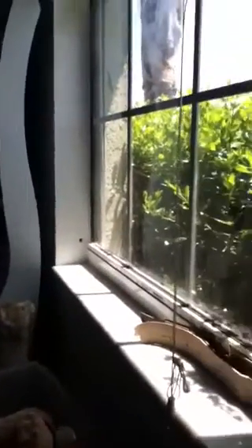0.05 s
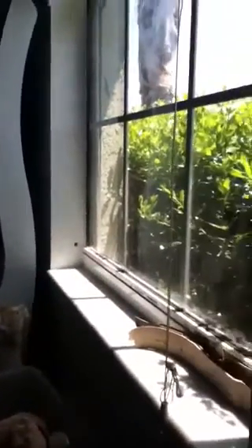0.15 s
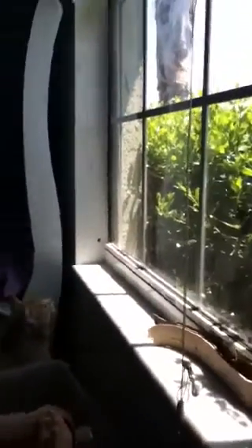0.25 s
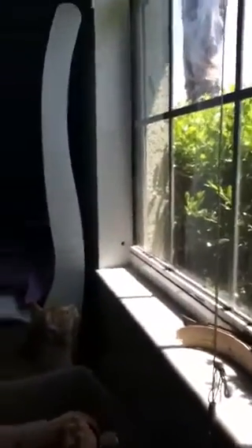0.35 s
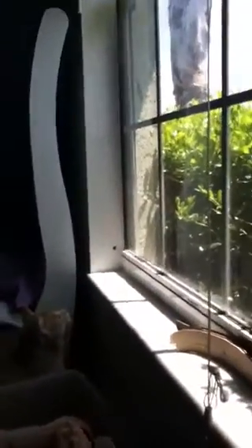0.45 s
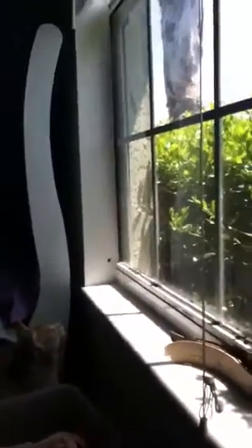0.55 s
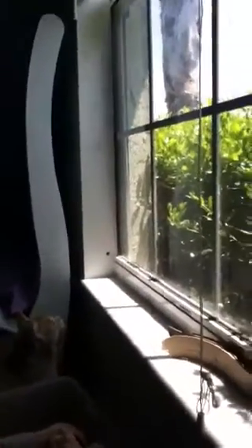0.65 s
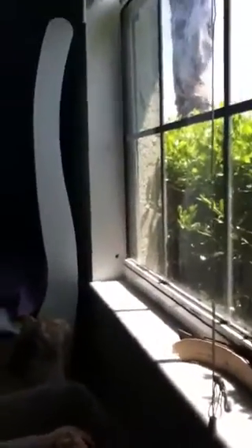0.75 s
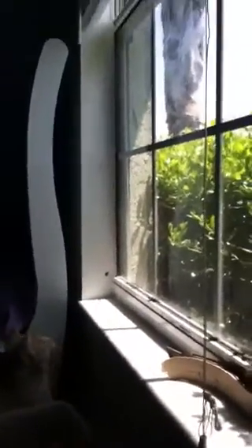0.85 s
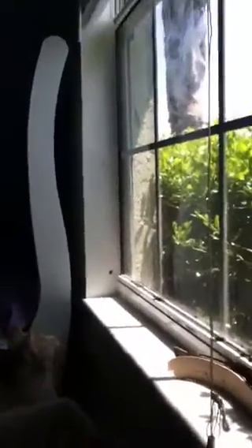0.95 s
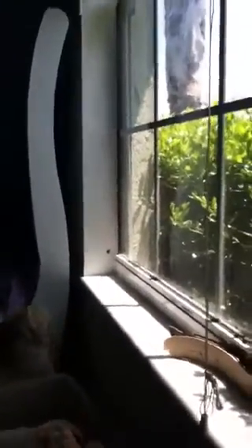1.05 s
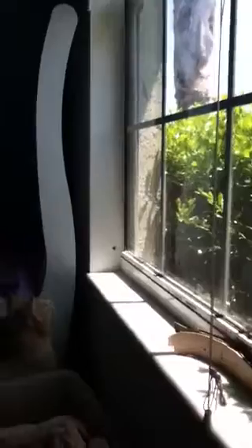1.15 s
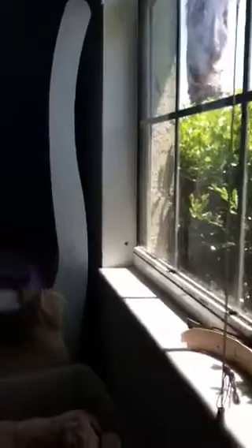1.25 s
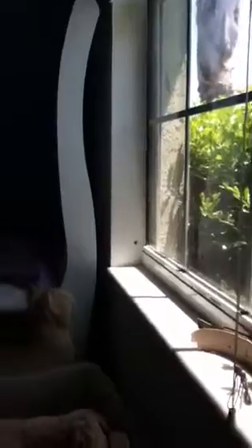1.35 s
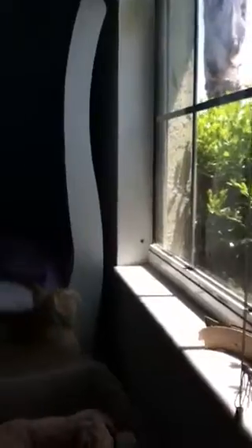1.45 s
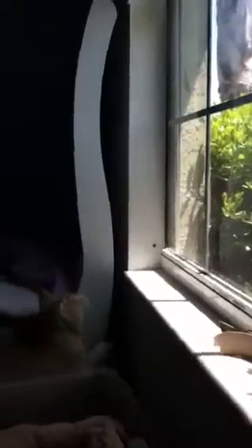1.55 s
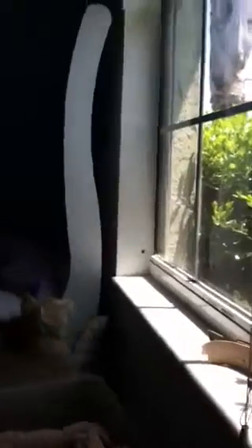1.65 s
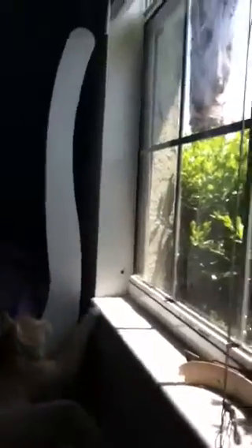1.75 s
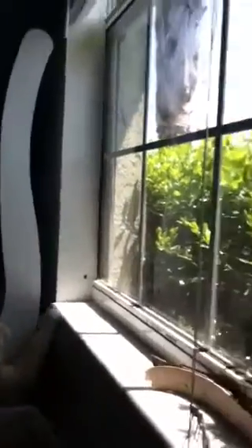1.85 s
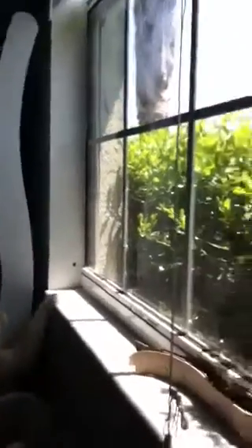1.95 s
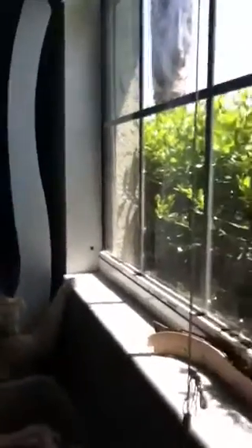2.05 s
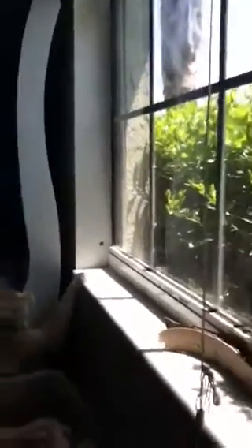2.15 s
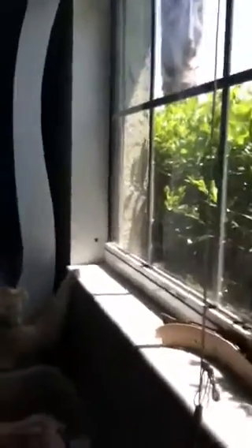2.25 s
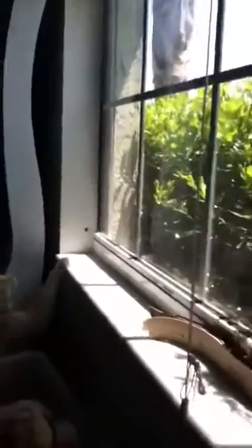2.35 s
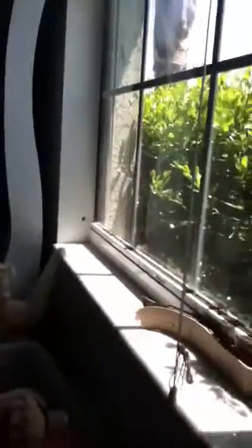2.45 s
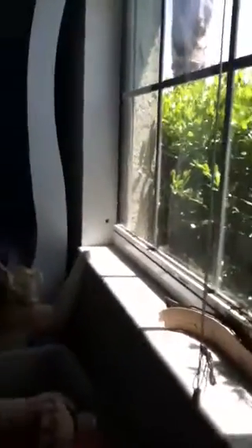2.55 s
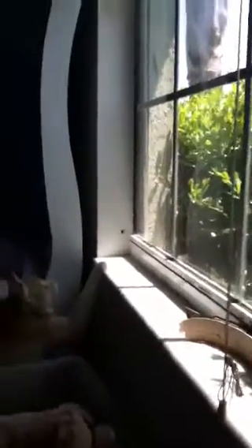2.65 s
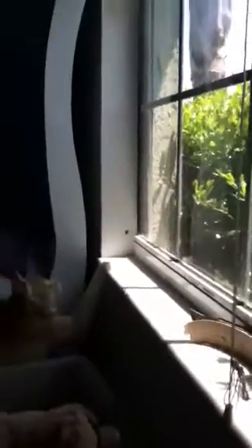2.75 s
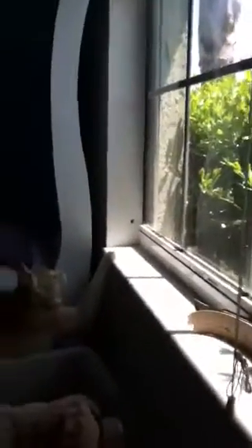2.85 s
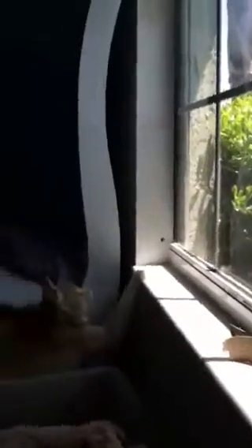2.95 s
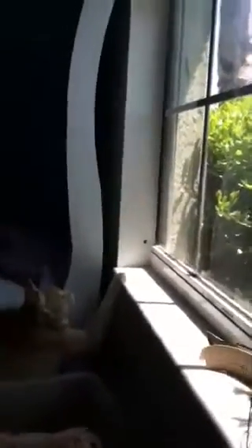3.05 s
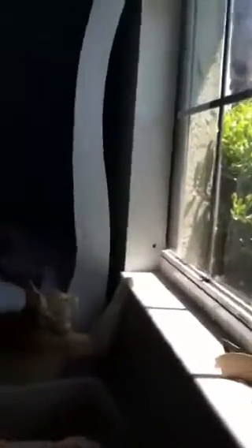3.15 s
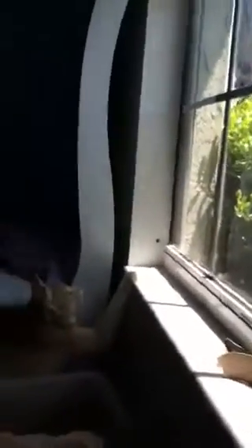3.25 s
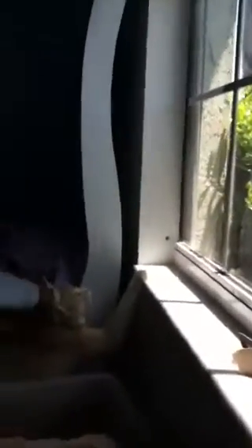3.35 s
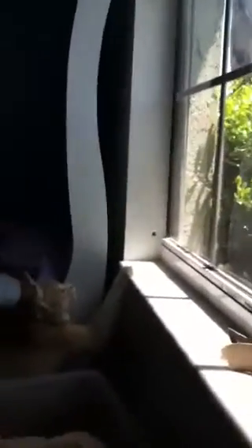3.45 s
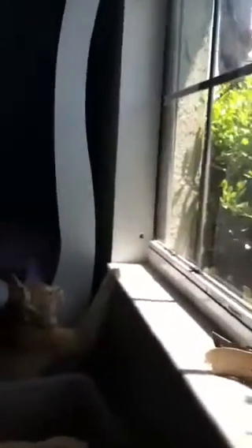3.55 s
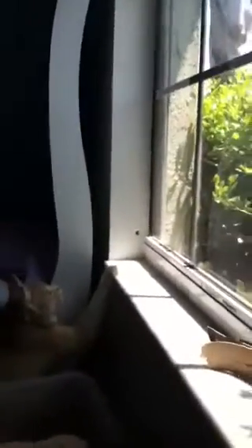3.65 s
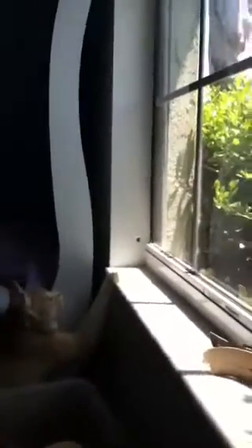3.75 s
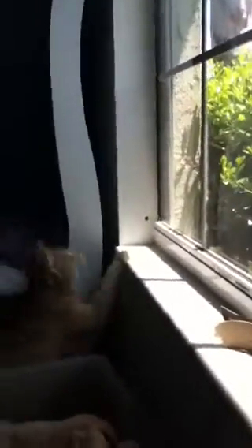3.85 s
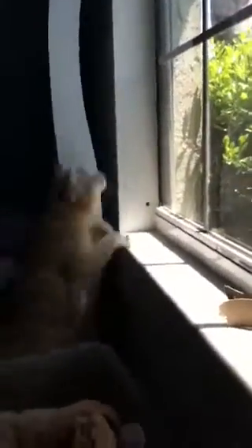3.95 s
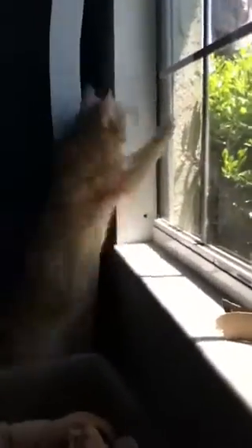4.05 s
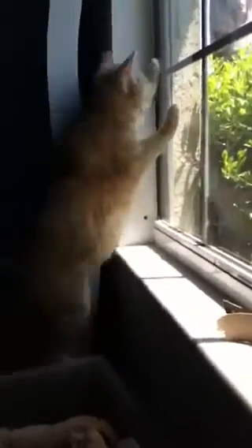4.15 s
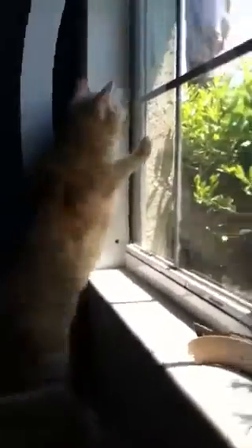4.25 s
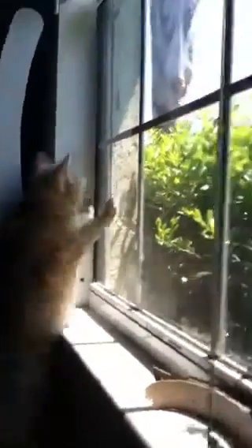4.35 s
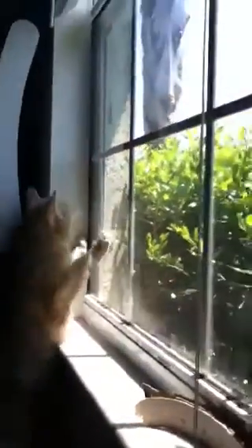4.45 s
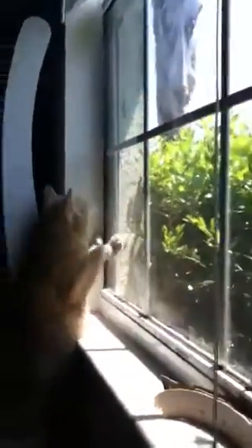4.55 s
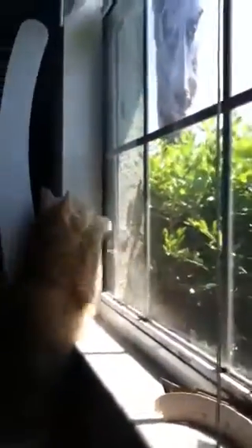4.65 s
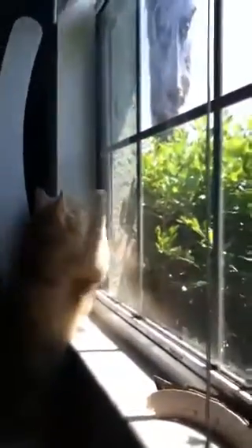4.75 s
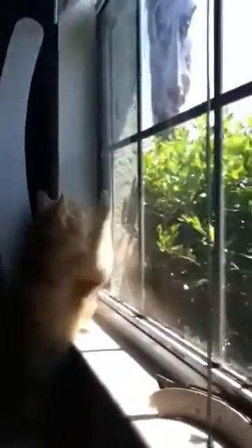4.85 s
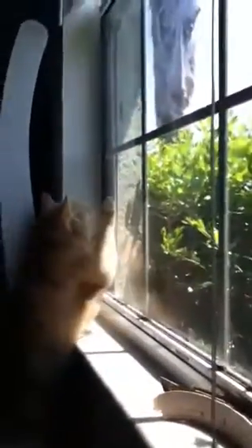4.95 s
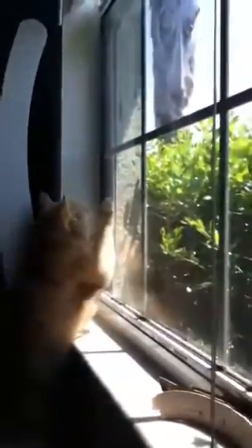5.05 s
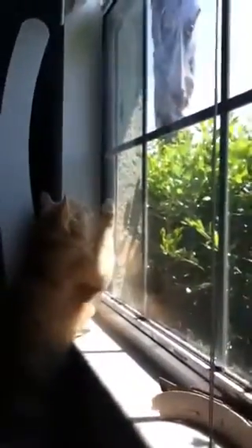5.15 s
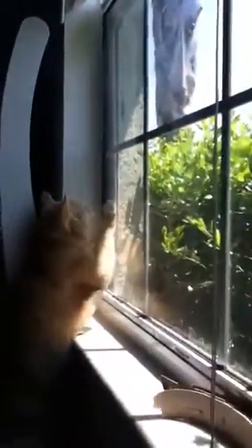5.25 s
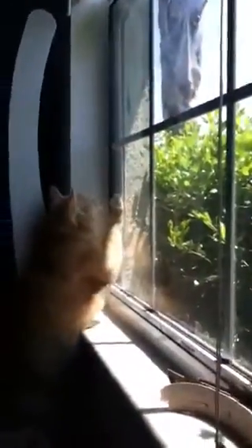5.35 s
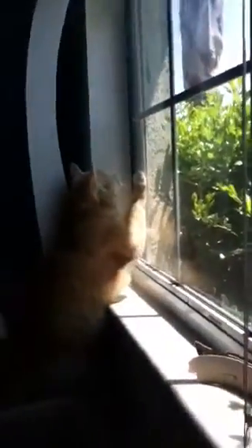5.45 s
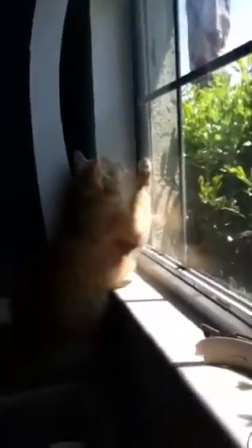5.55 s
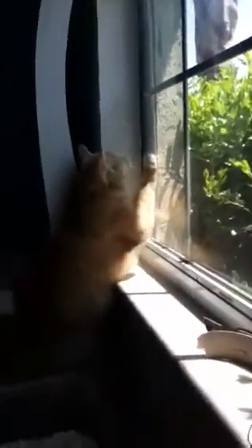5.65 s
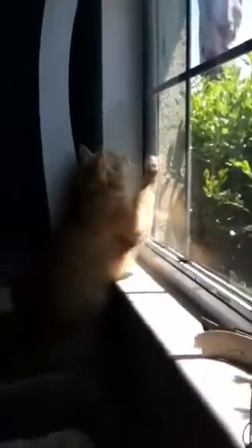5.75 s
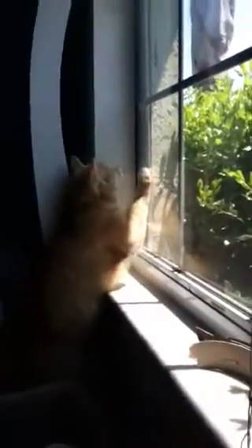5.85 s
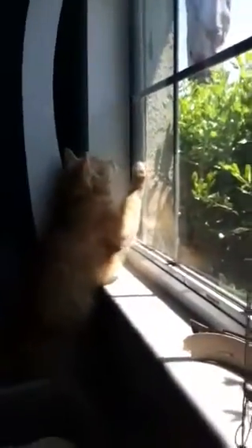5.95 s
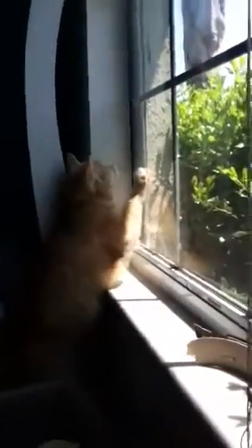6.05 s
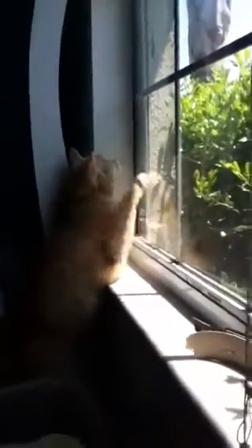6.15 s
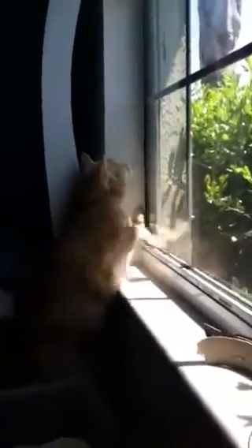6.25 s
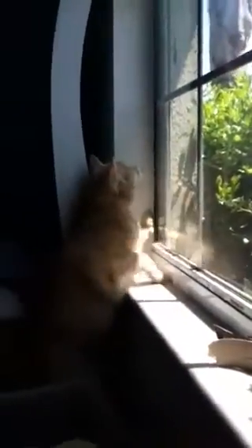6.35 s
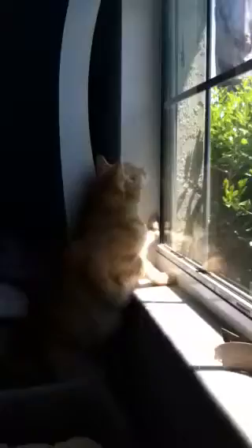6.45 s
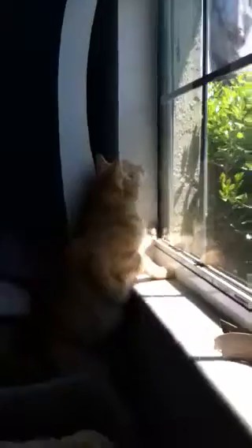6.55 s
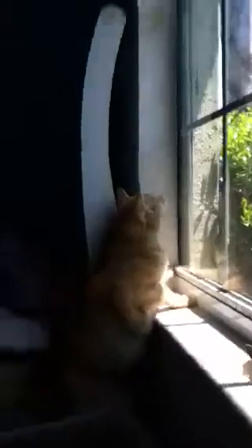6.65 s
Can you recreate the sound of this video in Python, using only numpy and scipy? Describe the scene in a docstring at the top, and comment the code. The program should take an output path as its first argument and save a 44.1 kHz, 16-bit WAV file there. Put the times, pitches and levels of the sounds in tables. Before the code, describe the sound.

A faint low hum fills a small, quiet room throughout. Two short, dull taps sound close by right at the start, followed by weaker ones until about 2 seconds. A cat's paws thump softly on a wooden windowsill at about 1.7, 2.3 and 3.1 seconds, with light ticks on the frame and tiny, faint pad squeaks around 3 seconds. At 4.2 seconds comes the loudest moment: a quick flurry of sharp claw clicks on the glass, with a slight deep wobble of the pane. Knocks and a short scrape on the frame follow until 4.5 seconds. Single lighter clicks come at 4.9 and 5.4 seconds, then a faint hiss of a paw sliding on glass and soft brushes of fur. A last small click and scrape sound near 6.7 seconds. From about 3.7 seconds, a bird outside gives five very faint, short falling whistles.

```python
"""A cat paws at a window

In a small quiet room, soft pads thump on the sill and fur brushes along it. The cat rears up: claws
click on the glass, the pane sways, and paws knock and scrape on the frame. Each impact excites the
damped modes of the body it strikes; friction adds squeaks and hiss. Small dull taps sound close by,
a low hum fills the room, and a bird whistles faintly outside."""
import sys
import numpy as np
from scipy import signal
from scipy.fft import rfft, irfft, next_fast_len
from scipy.io import wavfile

SR = 44100
rng = np.random.default_rng(int(sys.argv[2]) if len(sys.argv) > 2 else 0)


def wav_out(sig):
    """Save sig, one row per channel (or a flat mono array), as 16-bit PCM at SR to the path in sys.argv[1]."""
    wavfile.write(sys.argv[1], SR, np.round(np.clip(np.atleast_2d(sig).T, -1, 1) * 32767).astype(np.int16))


N = 295906


def from_db(db):
    """Amplitude ratio of a level in decibels."""
    return 10 ** (np.asarray(db) / 20)


def unit_rms(x):
    """Normalisation to an rms of 1."""
    return x / np.sqrt(np.mean(x ** 2) + 1e-20)


def at_hz(points, hz):
    """Interpolation on a logarithmic frequency axis."""
    known_hz, values = np.transpose(points)
    return np.interp(np.log(np.maximum(hz, 1)), np.log(known_hz), values)


def add(track, s, sound):
    """Superposition of a sound on a track, from time s."""
    start = int(s * SR)
    track[start:start + len(sound)] += sound[:max(N - start, 0)]


def low_pass(x, hz, order=2):
    """Butterworth low-pass filtering."""
    return signal.sosfilt(signal.butter(order, hz, fs=SR, output="sos"), x)


def fluctuation(hz, size=SR):
    """Random modulation of unit rms, low-passed at hz."""
    return unit_rms(low_pass(rng.standard_normal(size), hz))


def band_noise(low_hz, high_hz):
    """One second of band-limited noise."""
    band = signal.butter(2, [low_hz, high_hz], "band", fs=SR, output="sos")
    return signal.sosfilt(band, rng.standard_normal(SR))


def coloured_noise(spectrum, size):
    """Spectral shaping of white noise, to unit rms."""
    gain = from_db(at_hz(spectrum, np.arange(size // 2 + 1) * SR / size))
    return unit_rms(irfft(rfft(rng.standard_normal(size)) * gain, size))


def ringing(modes, detune):
    """An impulse response is a sum of damped modes; their strength and pitch vary with the spot hit."""
    longest_s = max(t60 for *_, t60 in modes)
    t = np.arange(int(longest_s * SR) + SR // 20) / SR
    out = np.zeros(len(t))
    for hz, db, t60 in modes:
        strength = from_db(db + 1.5 * rng.standard_normal())
        pitch = hz * (1 + detune * rng.standard_normal())
        decay = np.exp(-np.minimum(np.log(1000) * t / t60, 10 * np.pi))
        out += strength * decay * np.cos(2 * np.pi * pitch * t)
    return out


def strike_spot(x, hz, lift_db):
    """The point of excitation favours the modes near one frequency."""
    b, a = signal.iirpeak(hz, Q=11.7, fs=SR)
    return x + (from_db(lift_db) - 1) * signal.lfilter(b, a, x)


def impacts(rows, modes, detune):
    """A half-sine force pulse drives the modes: the longer the contact, the weaker the high ones."""
    out = np.zeros(N)
    for s, db, contact_s, *spot in rows:
        width = max(contact_s * SR, 1)
        force = np.sin(np.pi * np.arange(.5, width) / width)
        blow = np.convolve(ringing(modes, detune), force)
        if spot:
            blow = strike_spot(blow, *spot)
        add(out, s, from_db(db) * blow / np.abs(blow).max())
    return out


# Room noise: f/Hz, relative spectral level/dB
AIR_SPECTRUM = [(10, -14.5), (20, 6.5), (29, 0.5), (39, -10.5), (58, 1.5), (85, -10), (200, -19.5),
                (420, -25), (700, -29.5), (1300, -32.5), (2700, -35), (7000, -36), (10700, -38),
                (16000, -43)]
# Hum tones: f/Hz, rms level/dB
HUM_TONES = [(58.5, -62.5), (120, -65.5)]


def background():
    """Stationary rumble and hiss, under a hum with slow amplitude and phase modulation."""
    t = np.arange(N) / SR
    out = from_db(-47.93) * coloured_noise(AIR_SPECTRUM, next_fast_len(N, real=True))[:N]
    for hz, db in HUM_TONES:
        swell, wander = (0.3 * fluctuation(hz=3.6, size=N) for _ in range(2))
        out += from_db(db) * unit_rms((1 + swell) * np.sin(2 * np.pi * hz * t + wander))
    return out


# Taps close by: t/s, peak level/dB, contact/s
TAPS = [(.028, -21, 0.00035), (.2292, -24, 0.00042), (.579, -33.5, 0.0011), (.629, -38, 0.0012),
        (.784, -34.5, 0.00056), (1.139, -35, 0.0002), (1.5595, -32, 0.00088), (1.590, -30, 0.0012),
        (1.8122, -33.5, 0.00062), (1.9204, -30.5, 0.00028), (1.954, -37, 0.0016)]
# Modes of the tapped body: f/Hz, level/dB, T60/s
TAP_MODES = [(120, 3, 0.012), (450, -8.5, 0.0069), (704, -15, 0.0092), (910, 0, 0.012), (3650, 13, 0.0044),
             (5250, 14, 0.0022)]


def dull_taps():
    """Heavy damping makes each impact die within milliseconds."""
    return impacts(TAPS, TAP_MODES, detune=0.11)


# Fur brushing wall and sill: t/s, duration/s, rising fraction, level/dB, tilt/(dB per octave)
FUR_STROKES = [(0.841, 0.15, .3, -64, -3), (1.1, 0.25, 0.25, -57, 2.5), (5.166, 0.23, 0.37, -58.5, -1),
               (5.712, 0.21, 0.29, -54.5, -.3), (6.155, 0.25, 0.14, -50, -1),
               (6.521, 0.27, 0.35, -51.5, -1.3)]
# Rubbing noise: f/Hz, relative spectral level/dB
RUB_SPECTRUM = [(150, 0), (400, 8), (600, 5), (900, 5.5), (1400, -4), (2200, 4), (3500, -6.5), (5000, -6),
                (9000, -10), (15000, -28)]


def fur_rubs(strokes):
    """Sliding friction makes noise that swells and fades, grainy where the hairs catch."""
    out = np.zeros(N)
    for s, length, rise, db, tilt in strokes:
        size = int(length * SR)
        spectrum = [(hz, level + tilt * np.log2(hz)) for hz, level in RUB_SPECTRUM]
        catches = from_db(fluctuation(hz=152))
        noise = unit_rms(catches * coloured_noise(spectrum, SR))[:size]
        ramp = np.interp(np.linspace(0, 1, size), [0, rise, 1], [0, 1, 0])
        add(out, s, from_db(db) * noise * np.sin(np.pi / 2 * ramp) ** 2)
    return out


# Steps on the sill: t/s, pad level/dB, pad contact/s, jolt/dB, toe lag/s, toes/dB, toe spot f/Hz,
# claws/dB, claw contact/s, pad spot f/Hz, spot lift/dB; jolt, toes and claws are relative to the pad
STEPS = [(1.246, -38, 0.0014, -17, 0.026, -16, 199, -6.5, 0.0008, 139, 9),
         (1.624, -38.5, 0.0025, -21, 0.0051, -19, 240, -7, 0.00056, 770, 8),
         (1.7058, -15.5, 0.0032, -11, 0.0046, -14.5, 223, -11, 0.00013, 210, 0.5),
         (2.2912, -16.5, 0.00179, -15.5, 0.08, -8.5, 252.5, -14, 0.00013, 169, 4),
         (3.119, -17.5, 0.00205, -11, .0583, -11.5, 405, -11.5, 0.0004, 408, 4.5),
         (3.590, -38.5, 0.0019, -4, 0.019, -18, 240, -6, 0.00028, 223, 10)]


def step_forces():
    """A step is a series of excitations: the pad lands, toes and claws follow, the paw drags back."""
    on_sill, on_frame, drags = [], [], []
    jolt_contact_s, toe_contact_s, toe_lift_db = 0.001, 0.002, 15
    drag_lag_s, drag_s, drag_rise, drag_db, drag_tilt = 0.072, 0.36, 0.35, -41, 0.2
    for s, db, contact_s, jolt_db, lag_s, toe_db, toe_hz, claw_db, claw_contact_s, *spot in STEPS:
        on_sill.append((s, db, contact_s, *spot))
        on_frame.append((s, db + jolt_db, jolt_contact_s))
        on_sill.append((s + lag_s, db + toe_db, toe_contact_s, toe_hz, toe_lift_db))
        on_frame.append((s + lag_s, db + claw_db, claw_contact_s))
        drags.append((s + drag_lag_s, drag_s, drag_rise, db + drag_db, drag_tilt))
    return on_sill, on_frame, drags


# Modes of the wooden sill: f/Hz, level/dB
SILL_MODES = [(99, 4.5), (142, 0), (165, -0.5), (208, -1.5), (238, -4.5), (295, -9), (338, -14), (378, -9),
              (436, 2.5), (470, -5), (615, -3.5), (680, 1.5), (760, 11.5), (1030, -5), (1170, 5)]


def sill_thumps(blows):
    """Soft pads set the board booming; internal damping in wood takes the higher modes faster."""
    lowest_hz = SILL_MODES[0][0]
    modes = [(hz, db, 0.18 * (lowest_hz / hz) ** 0.28) for hz, db in SILL_MODES]
    return -impacts(blows, modes, detune=0.008)  # negative: the board is pushed away first


def bending(x, travel_s):
    """Dispersion: bending waves take travel_s at 1 kHz and less above, so a contact falls in pitch."""
    size = next_fast_len(N, real=True)
    hz = np.arange(size // 2 + 1) * SR / size
    phase = 4 * np.pi * travel_s * np.sqrt(hz * 1000)
    return irfft(rfft(x, size) * np.exp(-1j * phase), size)[:N]


# Paws and claws on the frame: t/s, level/dB, contact/s, spot f/Hz, spot lift/dB
KNOCKS = [(2.8586, -32.5, 0.00028, 2670, 4), (2.88, -41, 0.00017, 2500, 11), (3.2525, -42, 0.00028, 950, 1),
          (3.3, -36.5, 0.0013, 683, 4), (4.026, -43, 0.00043, 1600, 9), (4.2865, -25, 0.00018, 3060, 11),
          (4.3573, -25, 0.00016, 2420, 13.5), (4.372, -29.5, 0.00013, 2580, 6),
          (4.4606, -18.5, 0.00021, 1100, 8), (5.448, -31, 0.00019, 3380, 8)]
# Modes of the frame: f/Hz, level/dB, T60/s
FRAME_MODES = [(380, -4.5, 0.0059), (833, -13.5, 0.012), (1075, -6.5, 0.0074), (1410, -21, 0.0089),
               (1830, -7, 0.0041), (2590, -12, 0.0098), (3130, -7.5, 0.0091), (3880, 2, 0.0012),
               (4670, 2, 0.0022), (6370, -16, 0.0031), (8150, 4.5, 0.0033)]


def frame_knocks(steps):
    """Steps and knocks excite the frame's modes, and the vibration spreads as bending waves."""
    return bending(impacts(steps + KNOCKS, FRAME_MODES, detune=0.048), travel_s=0.00276)


# Pads squeaking on the painted sill: t/s, start f/Hz, end f/Hz, peak level/dB
SQUEAKS = [(2.9007, 1600, 664, -43.5), (2.921, 835, 1140, -47.5), (3.179, 1470, 1000, -50),
           (3.252, 970, 870, -47)]


def pad_squeaks(length_s=0.0087):
    """Friction-induced oscillation: a pad catching on paint chirps for a few uneven cycles."""
    out, size = np.zeros(N), int(length_s * SR)
    for s, start_hz, end_hz, db in SQUEAKS:
        hz = np.geomspace(start_hz, end_hz, size) * (1 + 0.16 * fluctuation(start_hz)[-size:])
        add(out, s, from_db(db) * np.hanning(size) * np.sin(2 * np.pi * np.cumsum(hz) / SR))
    return out


# The bird's whistles: t/s, rms level/dB
WHISTLES = [(3.665, -71), (4.68, -66.5), (5.205, -67.5), (5.71, -67.5), (6.23, -67)]


def bird(length_s=0.155, start_hz=3040, end_hz=2170, quaver_hz=85, flutter_db=4):
    """Frequency modulation: a pure tone holds its pitch, then curves down with an uneven quaver."""
    out, along = np.zeros(N), np.linspace(0, 1, int(length_s * SR))
    fall = np.sin(np.pi / 2 * np.interp(along, [0.3, 1], [0, 1])) ** 2
    swell = np.sqrt(np.abs(np.sin(np.pi * along ** 1.6)))  # loudest on the way down
    for s, db in WHISTLES:
        quaver, flutter = (fluctuation(hz=90)[-len(along):] for _ in range(2))
        hz = start_hz + (end_hz - start_hz) * fall + quaver_hz * quaver
        tone = np.sin(2 * np.pi * np.cumsum(hz) / SR)
        add(out, s, from_db(db) * unit_rms(swell * from_db(flutter_db * flutter) * tone))
    return out


# Claws striking the glass: t/s, level/dB, contact/s, spot f/Hz, spot lift/dB
CLAW_STRIKES = [(4.1643, 0, 0.00003, 9150, 6), (4.1938, -25, .00003, 9500, 10),
                (4.215, -18, 0.000058, 5300, 3), (4.2255, -2, 0.000055, 7830, 10),
                (4.224, -19, 0.000081, 3830, 24), (4.24, -20, 0.00004, 6840, -6),
                (4.2565, -21, .00004, 9700, 7), (4.2865, -19.5, 0.000057, 7000, 2),
                (4.881, -17, 0.000017, 7600, 5.5), (6.6634, -27.5, 0.000051, 5160, 7)]
# Modes of the glass: f/Hz, level/dB, T60/s
GLASS_MODES = [(381, -24, 0.072), (488, -23, 0.05), (1076, -23, 0.049), (1960, -28, 0.017),
               (4270, -12.5, 0.015), (5100, -7, 0.019), (5850, 0, 0.01), (6580, 2, 0.0046),
               (6840, 1, 0.0054), (8000, -11, 0.0044), (8820, -2.5, 0.003), (11100, -8, 0.003),
               (13500, -3, 0.0039)]


def claw_clicks():
    """A brief, hard contact has a broad spectrum, so it reaches the high modes of the glass."""
    clicks = impacts(CLAW_STRIKES, GLASS_MODES, detune=0.013)
    return bending(low_pass(clicks, hz=12200, order=4), travel_s=0.003)


def paw_shoves(lag_s=0.0012, gain_db=-32.5, contact_s=0.0024, spot_hz=139.5, lift_db=8):
    """Structural coupling: the paw behind each claw passes a blow through the window to the sill."""
    return [(s + lag_s, db + gain_db, contact_s, spot_hz, lift_db) for s, db, *_ in CLAW_STRIKES]


# Lowest modes of the whole pane: f/Hz, level/dB, T60/s
SWAY_MODES = [(27.15, -19.5, 1), (54, -22.5, 0.67)]


def pane_sway(gain_db=-25.5, push_s=0.016):
    """The slow push of the paw behind each claw sets the pane in free, low-frequency vibration."""
    pushes = [(s, db + gain_db, push_s) for s, db, *_ in CLAW_STRIKES]
    return impacts(pushes, SWAY_MODES, detune=0.11)


# Claws dragging over the frame: t/s, duration/s, level/dB
SCRAPES = [(4.165, 0.14, -50.5), (4.421, 0.039, -49), (4.4645, 0.01, -38.5), (4.4699, 0.014, -29),
           (4.474, 0.049, -44), (5.423, 0.065, -54.5), (6.627, 0.15, -55.5)]
# Modes of claw and frame in contact: f/Hz, level/dB, T60/s
CHATTER_MODES = [(1170, 0, .012), (1680, 1, 0.012), (2800, -2, .006), (3200, 0, .005), (3500, 2.5, 0.0055),
                 (5600, -1, 0.003), (7100, 1, 0.003), (8300, -1, 0.0025), (12000, -12, 0.0015)]


def claw_scrapes(slips_per_s=5000, spread_db=4):
    """Stick-slip friction: each slip is an impulse that sets claw and frame chattering."""
    out = np.zeros(N)
    for s, length, db in SCRAPES:
        size = int(length * SR)
        slipping = rng.random(size) < slips_per_s / SR
        strength = from_db(spread_db * np.clip(rng.standard_normal(size), -2, 2))
        slips = slipping * strength * rng.choice([-1, 1], size) * signal.windows.tukey(size, .5)
        chatter = signal.fftconvolve(slips, ringing(CHATTER_MODES, detune=0.023))
        power = np.sum(chatter ** 2) / size
        add(out, s, from_db(db) * chatter / np.sqrt(power + 1e-20))
    return bending(low_pass(out, hz=9600), travel_s=0.003)


# A pad sliding on the glass: t/s, duration/s, level/dB
SLIDES = [(5.448, 0.5, -60.5)]


def pad_slides(catch_db=3.5):
    """Friction on glass gives a narrow band of hiss, modulated in level as the pad catches."""
    out = np.zeros(N)
    for s, length, db in SLIDES:
        size = int(length * SR)
        catches = from_db(catch_db * fluctuation(hz=50))
        hiss = unit_rms(catches * band_noise(5600, 6960))[:size]
        add(out, s, from_db(db) * hiss * np.hanning(size))
    return out


def recess(x, t60, level_db):
    """Early reflections: the window recess scatters each contact back within 50 ms."""
    t = np.arange(SR // 20) / SR
    response = rng.standard_normal(len(t)) * np.exp(-np.log(1000) * t / t60)
    return x + from_db(level_db) * signal.fftconvolve(x, response / np.linalg.norm(response))[:N]


# Reverberation time of the room: f/Hz, T60/s
ROOM_DECAY = [(100, 0.032), (500, 0.55), (1050, 0.49), (2000, 0.28), (6000, 0.42), (14000, 0.46)]


def reverberation(x, build_s=0.0018):
    """A diffuse field builds up, then decays exponentially at its own rate in each octave."""
    t, response = np.arange(SR) / SR, np.zeros(SR)
    edges_hz = np.geomspace(60, 16000, 9)
    for low, high in zip(edges_hz, edges_hz[1:]):
        t60 = at_hz(ROOM_DECAY, np.sqrt(low * high))
        response += band_noise(low, high) * np.exp(-np.log(1000) * t / t60)
    response *= 1 - np.exp(-t / build_s)
    return signal.fftconvolve(x, response / np.linalg.norm(response))[:N]


def scene():
    """Direct and reverberant sound add; the close taps, rubs, squeaks and slide stay dry."""
    on_sill, on_frame, drags = step_forces()
    thumps = sill_thumps(on_sill + paw_shoves())
    knocks = frame_knocks(on_frame)
    whistles = bird()
    clicks = claw_clicks()
    scrapes = claw_scrapes()
    window = recess(clicks, t60=0.026, level_db=-3.5) + recess(knocks, t60=0.1, level_db=-0.5)
    friction = fur_rubs(FUR_STROKES + drags) + pad_squeaks() + pad_slides()
    direct = dull_taps() + friction + thumps + window + whistles + pane_sway() + scrapes
    to_room = (from_db(-9.5) * thumps + from_db(-1.5) * knocks + from_db(-4.5) * whistles
               + from_db(-12.5) * clicks + from_db(-13) * scrapes)
    return (background() + direct + reverberation(to_room))[None]


def record(dry):
    """Band limiting: an elliptic low-pass cuts steeply above 15.9 kHz."""
    return signal.sosfilt(signal.ellip(10, .1, 80, 15900, fs=SR, output="sos"), dry)


dry = scene()
out = record(dry)
wav_out(out)
```